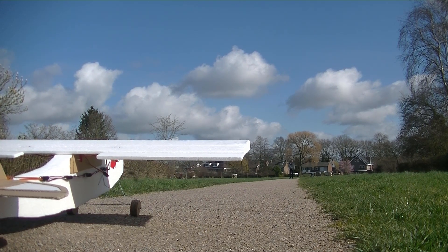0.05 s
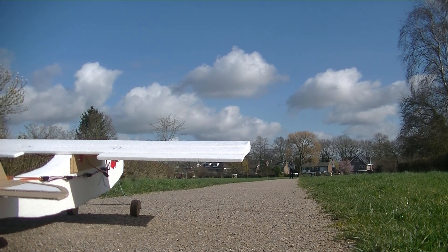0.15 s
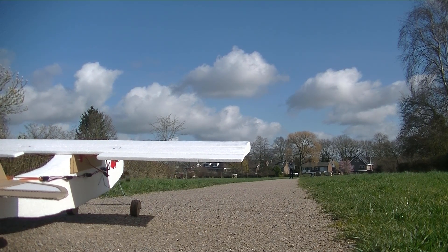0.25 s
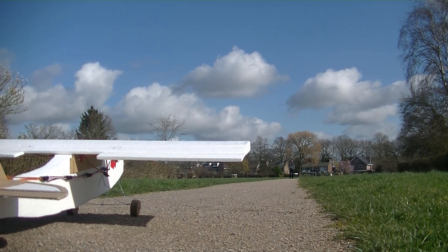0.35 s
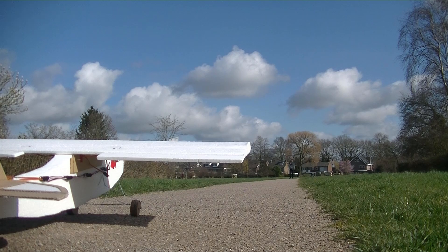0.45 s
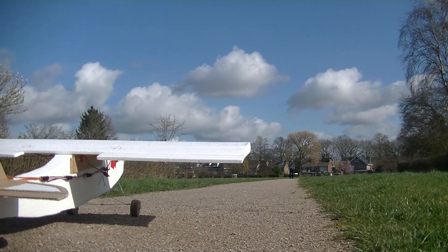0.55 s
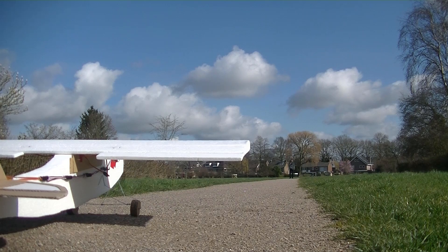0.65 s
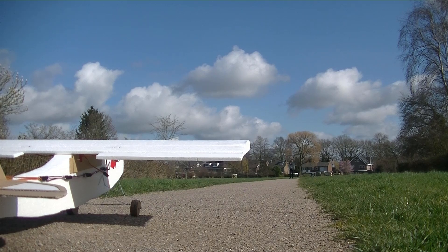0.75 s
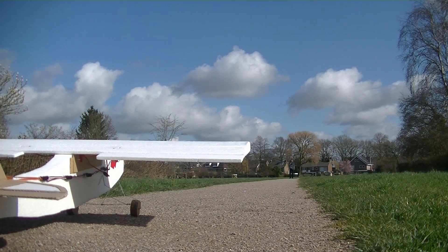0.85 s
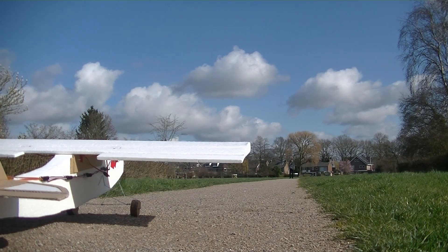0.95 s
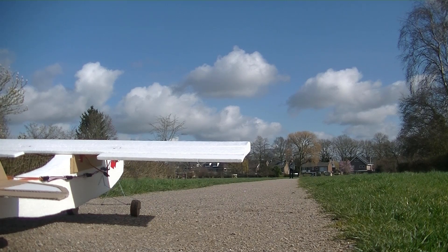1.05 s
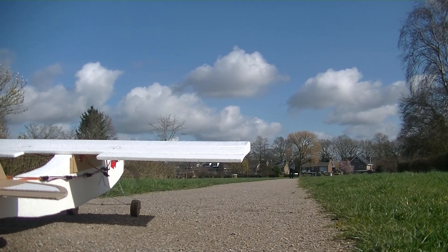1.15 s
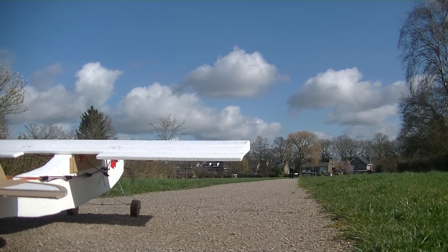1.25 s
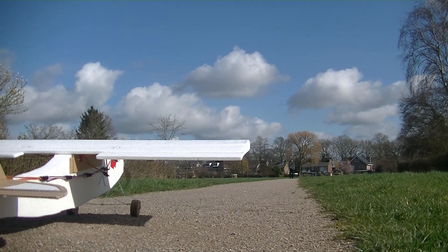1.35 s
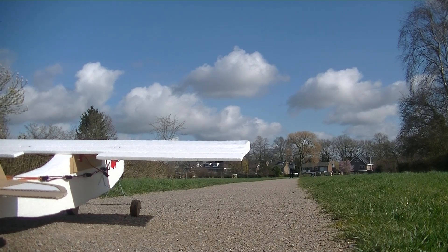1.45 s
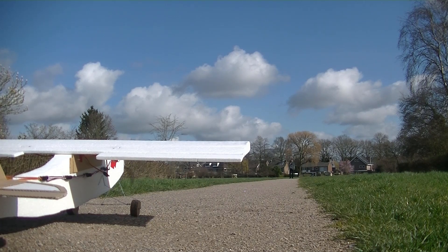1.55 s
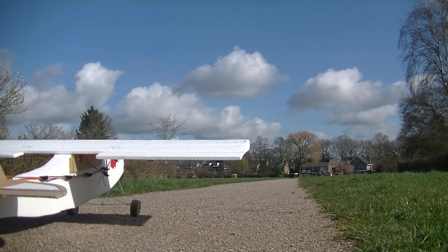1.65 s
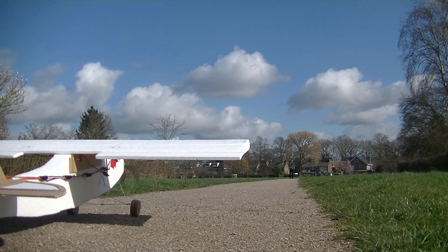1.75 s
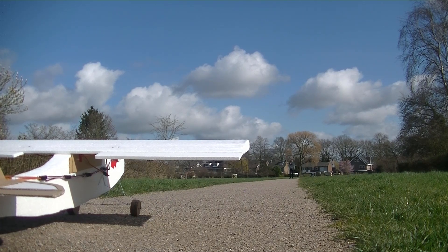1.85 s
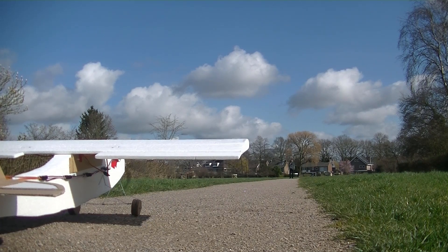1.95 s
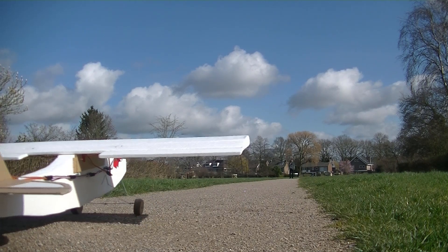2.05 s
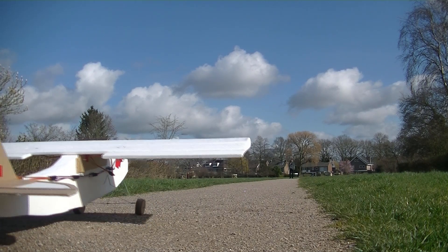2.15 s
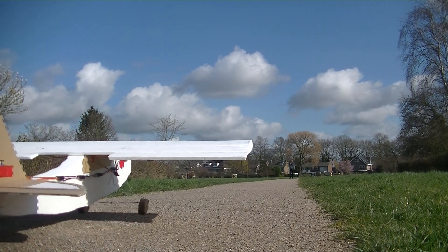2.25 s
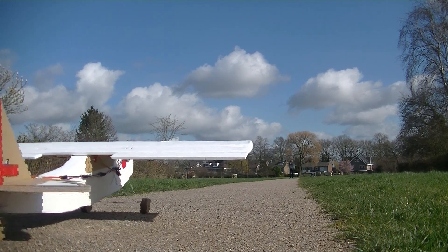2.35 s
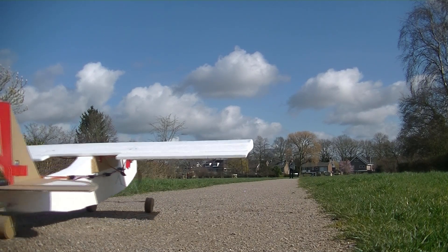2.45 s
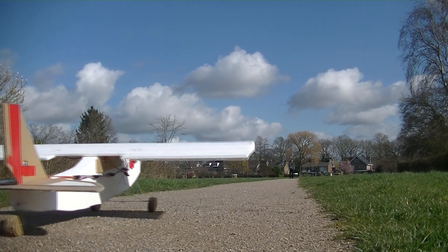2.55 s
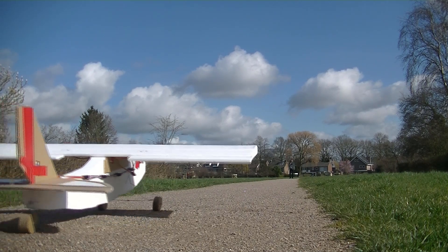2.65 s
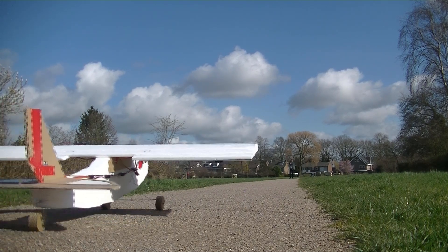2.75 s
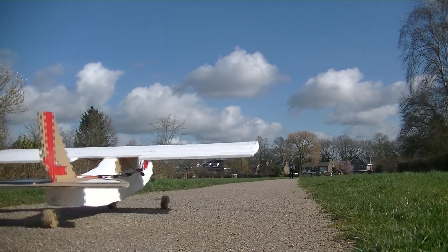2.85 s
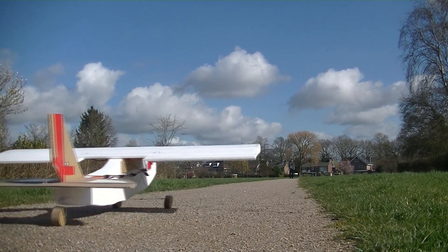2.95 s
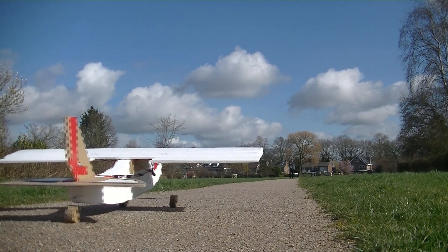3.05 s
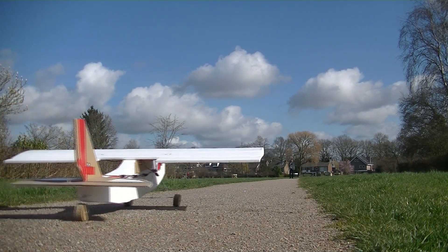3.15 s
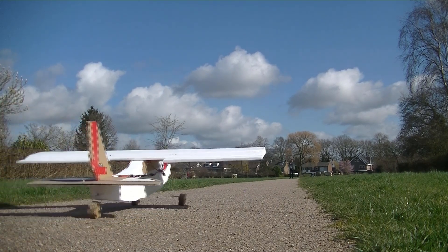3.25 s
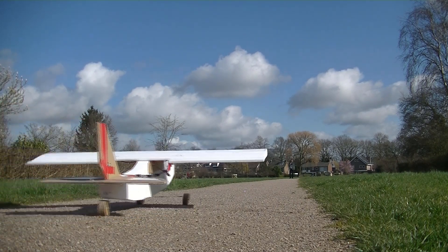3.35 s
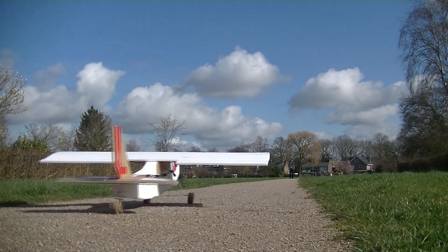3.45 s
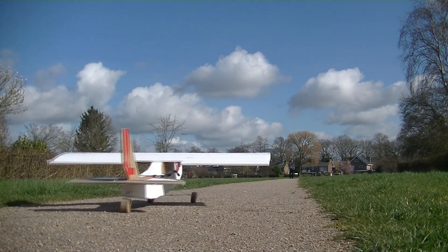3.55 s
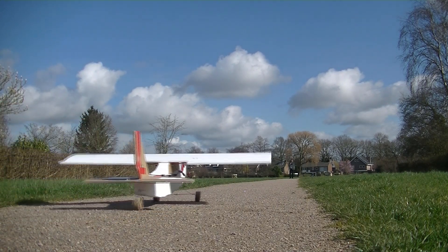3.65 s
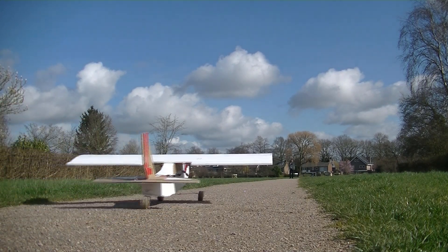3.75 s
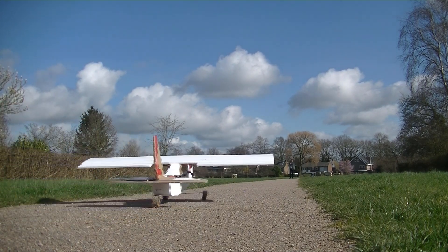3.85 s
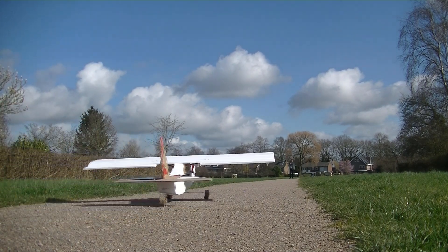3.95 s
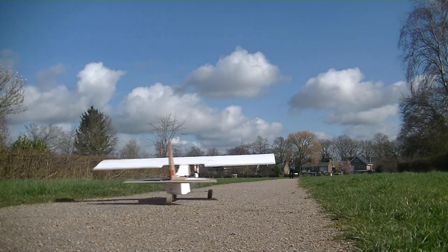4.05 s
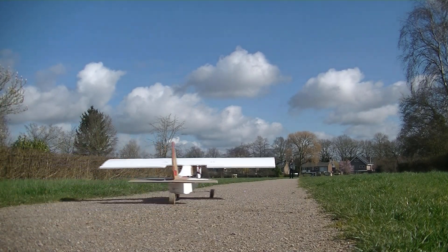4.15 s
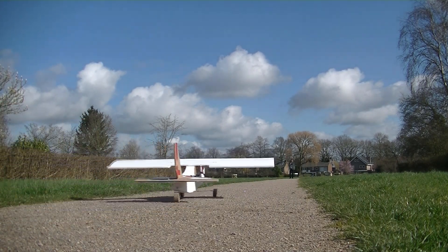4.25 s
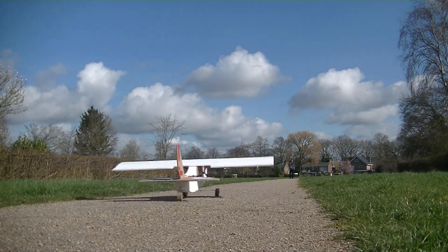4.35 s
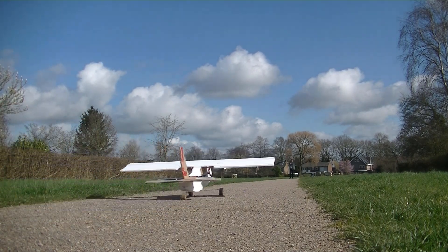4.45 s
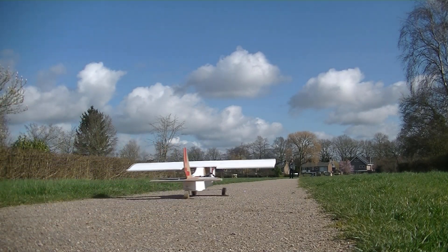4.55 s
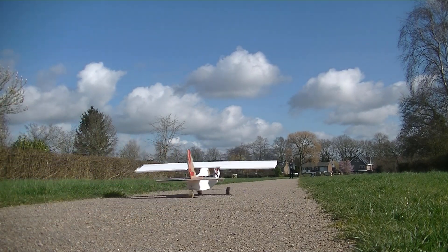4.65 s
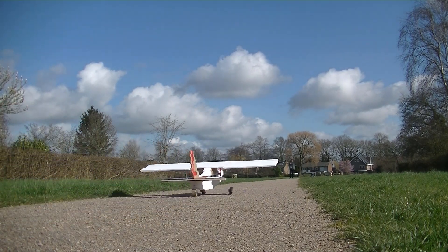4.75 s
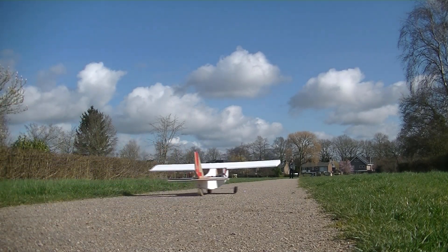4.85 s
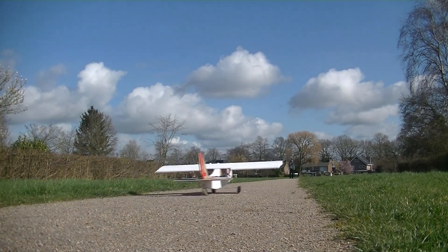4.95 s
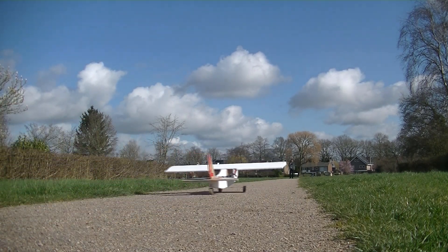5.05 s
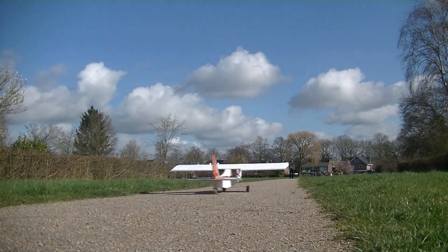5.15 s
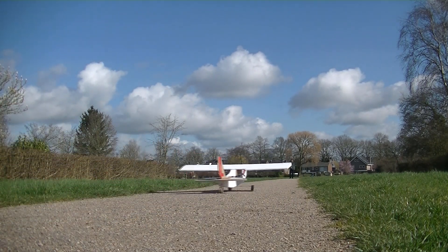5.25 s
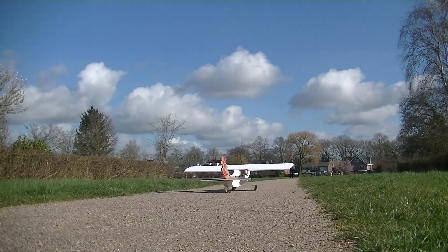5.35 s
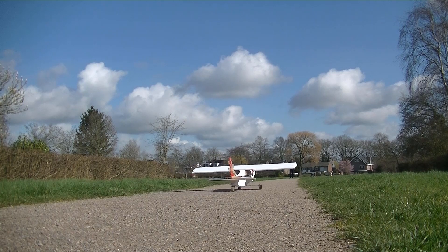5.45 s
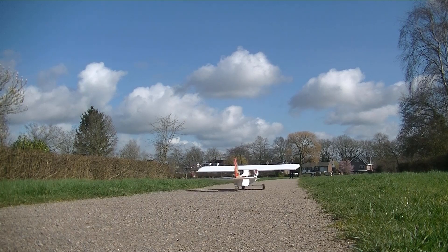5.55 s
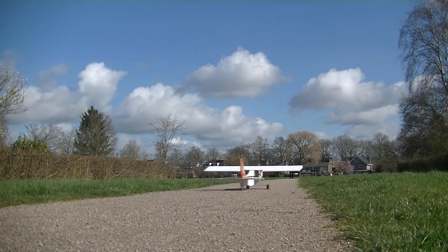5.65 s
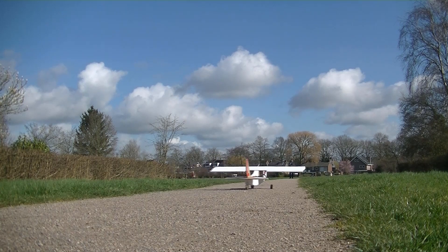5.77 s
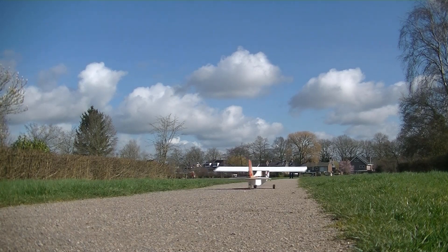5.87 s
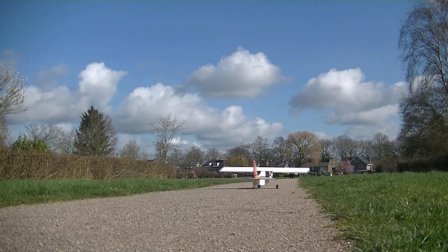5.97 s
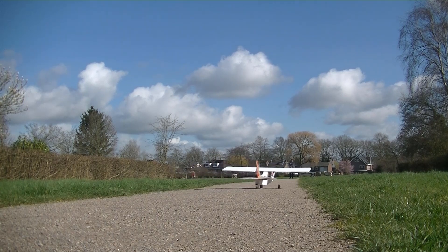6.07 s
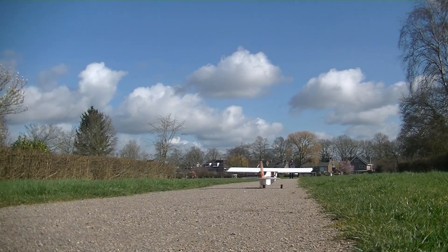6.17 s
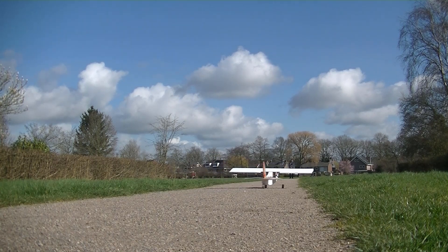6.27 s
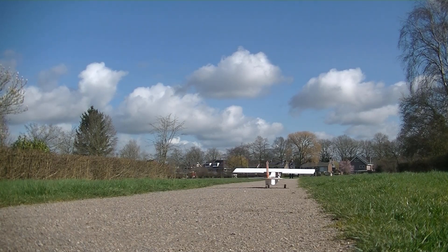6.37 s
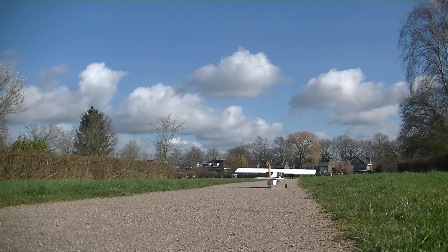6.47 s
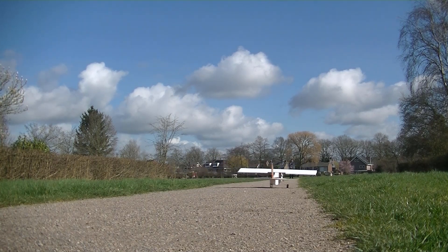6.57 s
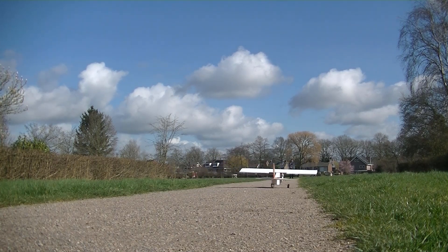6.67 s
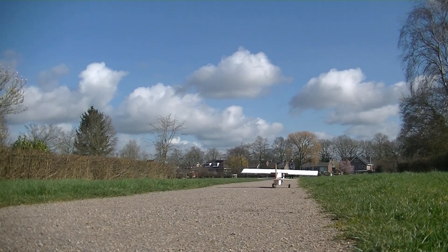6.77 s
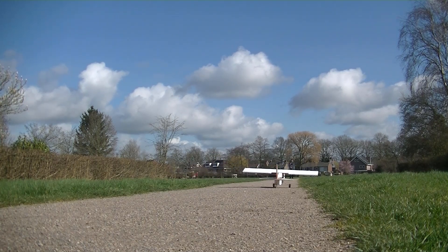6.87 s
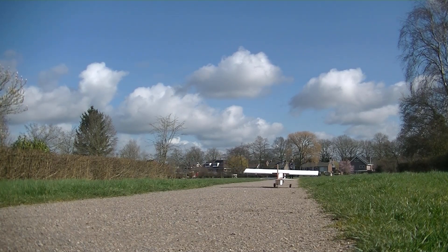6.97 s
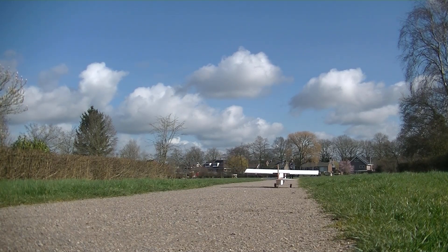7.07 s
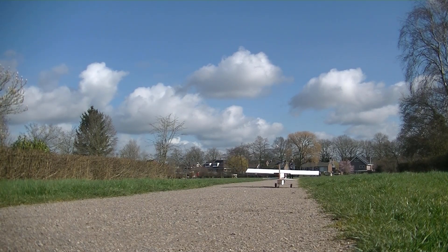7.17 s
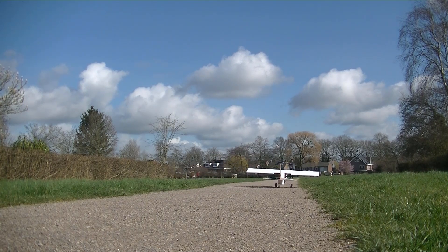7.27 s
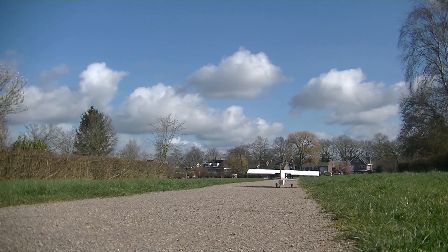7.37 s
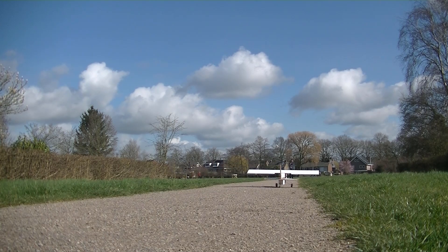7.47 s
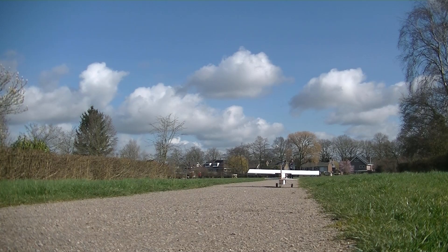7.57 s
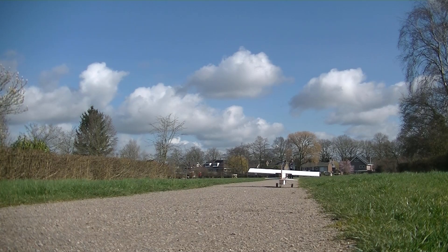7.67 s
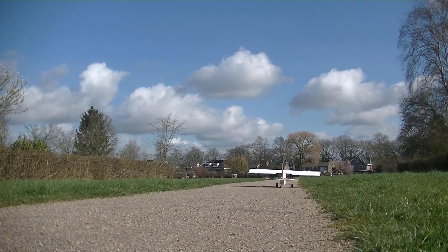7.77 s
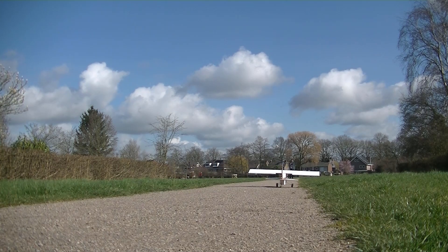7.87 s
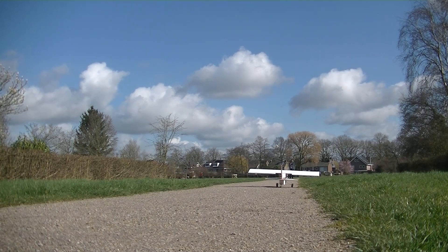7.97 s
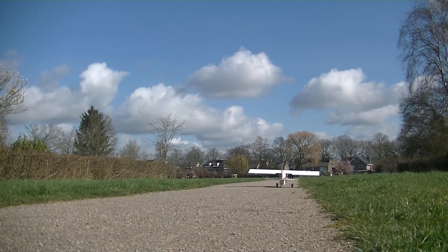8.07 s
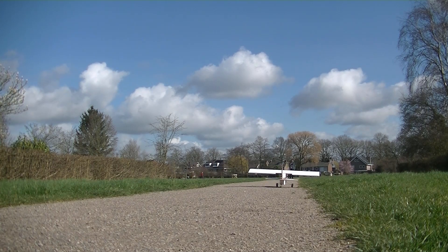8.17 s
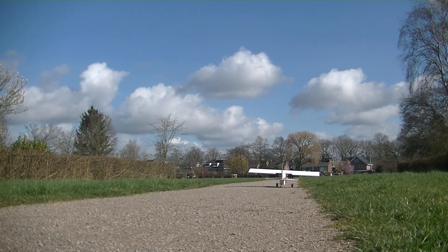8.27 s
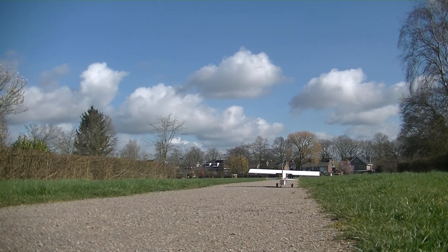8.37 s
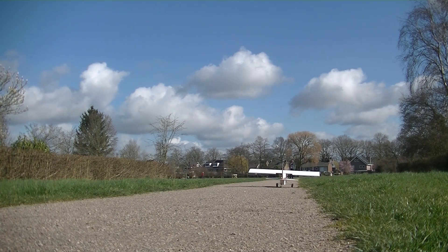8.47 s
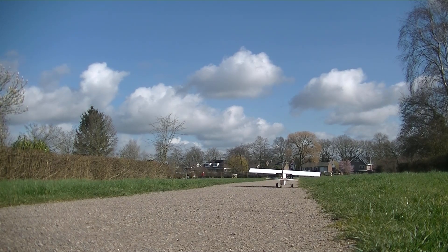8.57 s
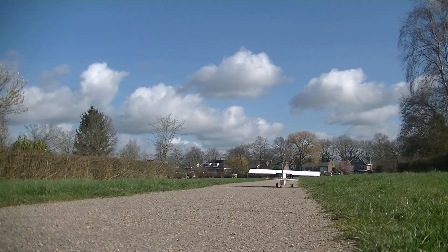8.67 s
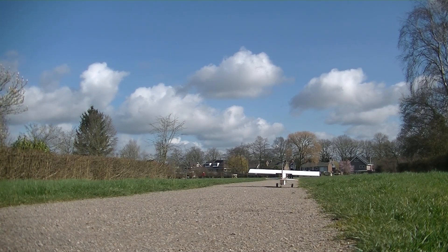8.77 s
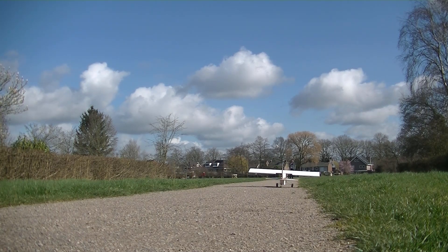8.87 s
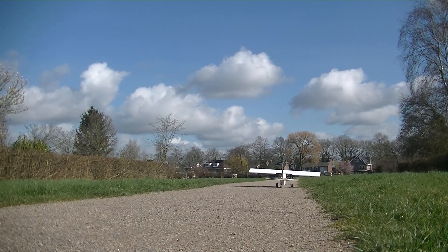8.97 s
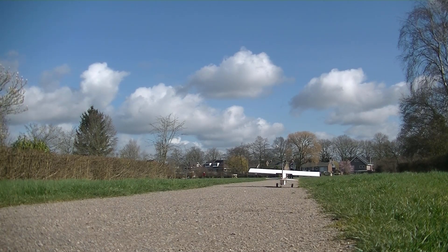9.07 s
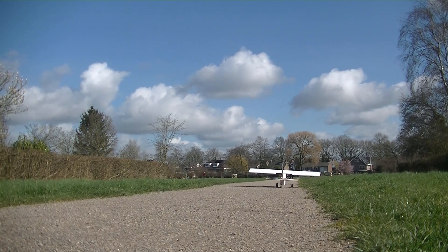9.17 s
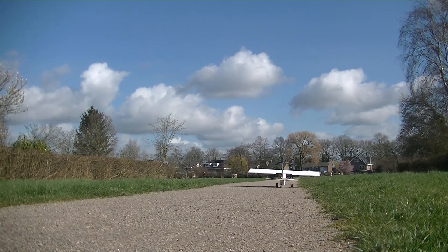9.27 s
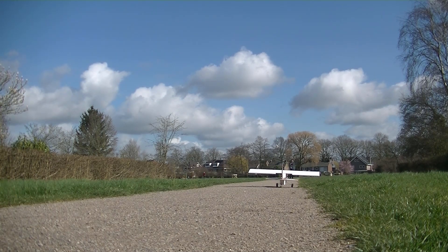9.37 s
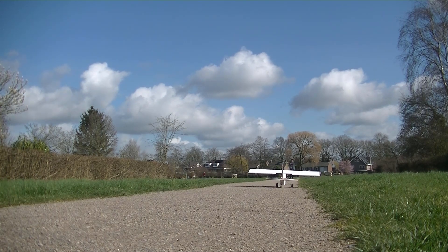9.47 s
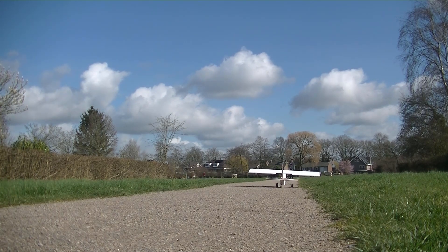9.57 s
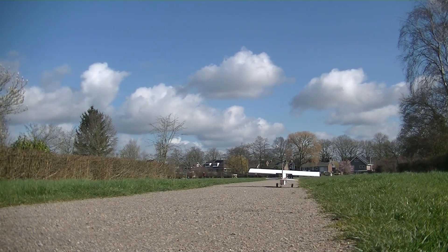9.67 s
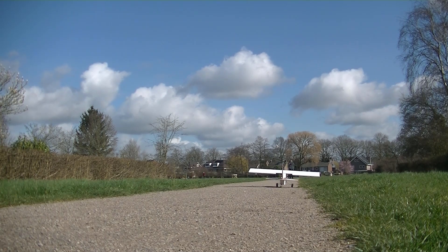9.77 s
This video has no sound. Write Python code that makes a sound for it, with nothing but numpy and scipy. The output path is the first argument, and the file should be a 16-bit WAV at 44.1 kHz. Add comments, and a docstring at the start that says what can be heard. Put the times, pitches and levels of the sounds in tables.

```python
"""A gravel path in a light breeze, the microphone close beside a small electric model plane.
The plane spins up with propeller tones, magnet whine, chopped air and a chattering motor mount,
then taxis away and stops, its wheels rattling the hollow airframe, its slipstream buffeting the
microphone. In the quiet that follows a small bird chirps and shoes shift on the grit close by."""
import sys
import numpy as np
from scipy import signal
from scipy.fft import rfft, irfft, next_fast_len
from scipy.io import wavfile
from scipy.ndimage import uniform_filter1d, map_coordinates

SR = 44100
rng = np.random.default_rng(int(sys.argv[2]) if len(sys.argv) > 2 else 0)


def unload_wav(signal):
    """Save mono or channel-first audio to the path in sys.argv[1] as 16-bit WAV at rate SR, clipped to [-1, 1]."""
    wavfile.write(
        sys.argv[1],
        SR,
        np.round(np.clip(np.atleast_2d(signal).T, -1, 1) * 32767).astype(np.int16),
    )


N = 433052


def amp(db):
    return 10 ** (np.asarray(db) / 20)


def unit(x):
    return x / np.sqrt(np.mean(x ** 2) + 1e-20)


def peaked(x, db):
    return amp(db) * x / abs(x).max()


def along(points, hz):
    """Read (frequency, value) points on a log axis."""
    freqs, values = np.transpose(points)
    return np.interp(np.log(hz + 1), np.log(freqs), values)


def curve(points):
    """Join (time, value) points, one value a sample."""
    return np.interp(np.arange(N) / SR, *np.transpose(points))


def wobble(rate):
    """A smooth random curve, rate knots a second."""
    knots = rng.standard_normal(int(N * rate / SR) + 4)
    grid = np.arange(0, N, 32)
    return np.interp(np.arange(N), grid, map_coordinates(knots, [grid * rate / SR]))


def filtered(x, response):
    """x times a response of frequency."""
    size = next_fast_len(N + SR // 2)
    return irfft(rfft(x, size) * response(np.fft.rfftfreq(size, 1 / SR)), size)[..., :N]


def coloured(x, spectrum, size=2048):
    """x through a causal filter with the given spectrum."""
    cepstrum = irfft(np.log(amp(along(spectrum, np.fft.rfftfreq(size, 1 / SR)))))
    cepstrum[1:size // 2] *= 2
    cepstrum[size // 2 + 1:] = 0
    return signal.oaconvolve(x, irfft(np.exp(rfft(cepstrum))))[:len(x)]


def burst(t60, size=2048):
    """Noise that dies by 60 dB in t60 seconds."""
    return rng.standard_normal(size) * amp(-60 * np.arange(size) / SR / t60)


def grains(rate, spread_db, ring, count=8):
    """Random contacts of uneven size, each with one of count rings drawn from ring()."""
    train = (rng.random(N) < rate / SR) * amp(spread_db * np.clip(rng.standard_normal(N), -2, 2))
    kind = rng.integers(count, size=N)
    return sum(signal.oaconvolve(train * (kind == k), unit(ring()))[:N] for k in range(count))


def fluttering_tone(phase, flutter_db):
    return np.sqrt(2) * np.sin(phase) * amp(flutter_db * wobble(18))


def add(track, s, sound):
    """Mix a sound in at time s."""
    part = track[round(s * SR):][:len(sound)]
    part += sound[:len(part)]


def scattered(x, t60, size=2048):
    """Dense reflections smear x into a dying tail."""
    tail = burst(t60, size)
    return signal.oaconvolve(x, tail / np.linalg.norm(tail))[:N]


# Width of sound from all round the microphone: (frequency [Hz], side minus mid [dB])
DIFFUSE_WIDTH = [(60, 1), (600, 0), (1400, -2.5), (3000, 1.5), (7000, -12.5), (15000, -92)]
def diffuse(spectrum):
    """Stereo noise, widest in the bass and middle."""
    mid, side = (unit(coloured(rng.standard_normal(N), spectrum)) for _ in range(2))
    side = filtered(side, lambda hz: amp(along(DIFFUSE_WIDTH, hz)))
    return np.array([mid + side, mid - side])


# Scatter off the ground near the microphone: (frequency [Hz], side minus mid [dB])
GROUND_SCATTER = [(100, -3), (400, -11), (1000, -14), (2500, -17), (12000, -24)]
# Lead of the left channel: (frequency [Hz], phase [rad])
LEFT_LEAD = [(260, 0), (950, -.9), (3800, .35), (7000, 0)]
def placed(x, balance):
    """A near source leans to one side; ground scatter widens it a little."""
    def lean(hz):
        gains = 2 / (1 + amp(np.outer([-1, 1], along(balance, hz))))
        return gains * np.exp(.5j * np.outer([1, -1], along(LEFT_LEAD, hz)))
    side = filtered(scattered(x, t60=.07), lambda hz: amp(along(GROUND_SCATTER, hz)))
    return filtered(x, lean) + np.array([side, -side])


# Open air around the path: (frequency [Hz], level [dB])
BREEZE_SPECTRUM = [(15, -61), (25, -25), (87, -15), (242, -1), (1400, -9.5), (3820, -5.5), (5570, -6.5),
                   (6560, -9), (7310, -13.5), (14000, -20.5), (16000, -44)]
def breeze():
    """A faint, wavering rush, spread wide, a shade louder on the left."""
    return amp(-57 + .77 * wobble(2.063)) * diffuse(BREEZE_SPECTRUM) * amp([[1], [-1]])


# One call, an arch, a flick up and a fall:
# (delay [s], length [s], start pitch [Hz], middle pitch [Hz], end pitch [Hz], level [dB])
CALL_NOTES = [(0, .058, 3200, 4420, 3400, 0), (.06, .02, 3450, 3900, 4430, -1),
              (.088, .045, 3200, 2950, 2750, 0)]
# Whole calls: (time [s], level [dB])
CALLS = [(7.763, -41), (8.782, -45)]
# Lone notes: (time [s], length [s], start pitch [Hz], middle pitch [Hz], end pitch [Hz], level [dB])
LONE_NOTES = [(7.49, .055, 6000, 5750, 5100, -55), (8.25, .035, 3720, 3950, 3800, -53),
              (8.632, .036, 3600, 3620, 3000, -46)]
def bird():
    """Raspy, gliding whistles off to the left, echoing in the trees."""
    song = np.zeros(N)
    notes = [(s + delay, *shape, db + note_db)
             for s, db in CALLS for delay, *shape, note_db in CALL_NOTES]
    for s, length, *pitches, db in notes + LONE_NOTES:
        progress = np.linspace(0, 1, int(length * SR))
        hz = np.polyval(np.polyfit([0, .5, 1], pitches, 2), progress)
        hz *= 1 + .18 * uniform_filter1d(rng.standard_normal(len(hz)), 40)  # rasp
        envelope = amp(db) * np.sqrt(abs(np.sin(np.pi * progress)))
        add(song, s, envelope * np.sin(2 * np.pi * np.cumsum(hz) / SR))
    song *= amp(2.4 * wobble(400))
    trees = np.array([scattered(song, t60=.7, size=SR // 2) for _ in range(2)])
    return (song + amp(-2) * trees) * amp([[3], [-5]])


# Crushed grit, a hollower tread and a slipping sole: (frequency [Hz], level [dB])
CRUNCH_SPECTRUM = [(100, -48), (500, -19), (1300, -7), (1900, 1), (2400, 0.5), (3300, 6.5), (4800, 1),
                   (6800, 2.5), (7900, -5), (9200, -2), (10400, -15.5), (14000, -13)]
HOLLOW_SPECTRUM = [(100, -41), (900, -13), (1800, 0), (2300, 1), (3200, 5.5), (4850, -12), (5700, 3.5),
                   (7100, 2.5), (8300, -9), (9700, -13), (12000, -14), (15500, -15)]
SCRAPE_SPECTRUM = [(40, -50), (150, -7), (400, -6.5), (850, 3.5), (1100, 0.5), (1800, 1.5), (3500, 9.5),
                   (8000, -10)]
# A shoe bears down: (time of full weight [s], build [s], release [s], crunch [dB], scrape [dB])
FOOTSTEPS = [(7.1, 0.62, .16, -41.5, -48), (7.32, .29, .11, -51, -55), (7.86, .12, .22, -48.5, -58),
             (8.64, .1, .09, -45, -58), (8.728, .08, .025, -41, -37.5), (9.07, .16, .11, -45, -66),
             (9.152, 0.03, .042, -41, -37), (9.27, .22, .094, -34, -40), (9.81, .59, .1, -34, -45.5)]
# A lone sharp click at the start, then stones snapping underfoot: (time [s], level [dB], pitch [Hz])
SHARP_CLICKS = [(0.0354, -20.5, 2290), (7.795, -20, 3800), (7.902, -27, 3300), (8.056, -28.5, 6410),
                (8.452, -23, 3960), (8.4895, -21, 3600), (8.7223, -25, 2930), (8.7302, -19, 2300),
                (9.079, -22, 5950), (9.1482, -18.5, 7340), (9.263, -23, 3600), (9.2878, -22.5, 3600),
                (9.36, -26, 3350), (9.4687, -24, 2960), (9.5135, -16.5, 3120), (9.5659, -13.5, 2850),
                (9.6134, -22, 5650), (9.696, -11, 3000), (9.786, -15, 6450), (9.7965, -17, 5610)]
# Shoes at the microphone: (frequency [Hz], left minus right [dB])
SHOE_BALANCE = [(200, 2), (800, 6), (2400, 3.5), (4400, 1.5), (7000, 0)]
def shoes(hollow_from_s=9.38):
    """Close on the left: a lone opening click; later soles press and scrape the grit and stones snap."""
    grit = grains(rate=2800, spread_db=6.5, ring=lambda: burst(t60=.003))
    crunch, hollow = unit(coloured(grit, CRUNCH_SPECTRUM)), unit(coloured(grit, HOLLOW_SPECTRUM))
    slips = grains(rate=4700, spread_db=10.5, ring=lambda: burst(t60=.0077))
    scrape = unit(coloured(slips, SCRAPE_SPECTRUM))
    track = np.zeros(N)
    for s, build, release, crunch_db, scrape_db in FOOTSTEPS:
        press = curve([(s - build, 0), (s, 1), (s + release, 0)]) ** 2.03
        track += amp(crunch_db) * press * (hollow if s > hollow_from_s else crunch)
        track += amp(scrape_db) * press ** 3.2 * scrape  # the sole slips only under full weight
    for s, db, hz in SHARP_CLICKS:
        spectrum = [(hz * .29, -26), (hz * .62, -3), (hz, 0),
                    (hz * 1.4, -11), (hz * 2, -14), (hz * 3.4, -30)]
        click = burst(t60=.003) + amp(-24) * burst(t60=.02)
        add(track, s, peaked(coloured(click, spectrum), db))
    return placed(track, SHOE_BALANCE)


# Gusts on the microphone: (time fully risen [s], hold [s], level [dB])
PROP_GUSTS = [(0.404, 0.68, -64), (3.715, 0.31, -47), (4.282, .07, -53), (4.4, 0.51, -65.5),
              (5.414, .15, -54.5), (5.58, 0.13, -51), (6.01, 0.028, -54.5)]
# Their rumble: (frequency [Hz], level [dB])
GUST_SPECTRUM = [(25, -37), (70, -20), (130, -5), (230, -2.5), (400, -10), (900, -43)]
def slipstream(rise_db_per_s=170, fall_db_per_s=118):
    """Swirls from the propeller reach the microphone ports, hold and die away."""
    t = np.arange(N) / SR
    gusts = [amp(db + np.minimum(t - s, 0) * rise_db_per_s - np.maximum(t - s - hold, 0) * fall_db_per_s)
             for s, hold, db in PROP_GUSTS]
    return np.max(gusts, axis=0) * amp(1.8 * wobble(24)) * diffuse(GUST_SPECTRUM)


# Modes of the airframe's panels: (frequency [Hz])
PANEL_MODES = [1030, 1600, 2270, 2660, 3080, 3400, 4030, 4420]
def panel_hit(hz=None, t60=.017, focus_db_per_octave=16):
    """A stone cracks against a wheel and rings the panels, most of all those near hz if given."""
    t, modes = np.arange(2048) / SR, np.array(PANEL_MODES)
    strength, detune, start = rng.standard_normal((3, len(modes)))
    db = 4 * strength - (focus_db_per_octave * abs(np.log2(modes / hz)) if hz else 0)
    cycles = np.outer(modes * (1 + .015 * detune), t) + start[:, None]
    ring = amp(db) @ np.sin(2 * np.pi * cycles) * amp(-60 * t / t60)
    return amp(-3) * unit(ring) + unit(burst(t60=.01))


# Response of the hollow airframe: (frequency [Hz], level [dB])
AIRFRAME_SPECTRUM = [(100, -60), (300, -10), (620, -14.5), (760, -8), (1050, -12), (1300, -8), (1600, -9),
                     (1850, -6.5), (2300, -0.5), (2900, -1.5), (3400, 1), (4550, 2), (5150, -11.5),
                     (5700, -19), (6150, -4), (6700, -11.5), (7300, -6.5), (8800, -21.5), (10500, -22),
                     (15500, -51)]
# The plane gathers pace, recedes and stops: (time [s], level [dB])
ROLL_LEVEL = [(1.9, -60), (2.5, -39.5), (3.3, -35), (3.7, -32.5), (5.5, -31), (5.95, -32.5), (6.42, -40),
              (6.75, -40.5), (7.15, -47.5), (7.45, -53), (7.7, -55), (8.0, -69)]
# Coarse patches of path: (middle time [s], length [s], boost [dB])
COARSE_PATCHES = [(2.689, .028, 11.5), (2.751, 0.024, 12.5), (2.967, .025, 4), (3.867, 0.025, 6.5),
                  (4.305, 0.02, 5.5), (4.426, 0.097, 4), (4.805, .05, 6.5), (5.387, .04, 4),
                  (5.606, 0.017, 5.5)]
# Separate stones take over as it slows: (time [s], share of the power [0-1])
STONE_SHARE = [(5.6, 0.16), (6.6, 0.64)]
def airframe_rattle(clumps):
    """Hard wheels drum clumps of gravel into the airframe."""
    t = np.arange(N) / SR
    dense = clumps * grains(rate=1200, spread_db=5, ring=panel_hit, count=20)
    sparse = grains(rate=110, spread_db=4, ring=panel_hit)
    gravel, stones = (unit(coloured(hits, AIRFRAME_SPECTRUM)) for hits in (dense, sparse))
    share = curve(STONE_SHARE)
    rattle = np.sqrt(1 - share) * gravel + np.sqrt(share) * stones
    coarse_db = sum(db * np.exp(-(2 * (t - s) / length) ** 2) for s, length, db in COARSE_PATCHES)
    jolt_db = 1.8 * wobble(22)  # the path is uneven
    return rattle * amp(curve(ROLL_LEVEL) + coarse_db + jolt_db)


# Wheels striking pebbles: (time [s], level [dB], pitch [Hz])
PEBBLE_STRIKES = [(2.38, -14.5, 2720), (2.599, -9.5, 2320), (2.7791, -15, 3780), (2.9631, -14.5, 2640),
                  (3.0758, -14, 2740), (3.0939, -14, 2710), (3.3494, -12.5, 2680), (3.5027, -12, 2700),
                  (3.6097, -12, 2640), (3.6341, -12.5, 3090), (3.71, -12.5, 3040), (3.7818, -13, 2720),
                  (3.8744, -15, 3170), (3.936, -16, 3950), (4.132, -14.5, 4080), (4.2852, -13, 2410),
                  (4.2997, -11.5, 4010), (4.5535, -13.5, 2250), (4.6554, -12, 3380), (4.794, -13, 3350),
                  (4.9744, -6.5, 3370), (5.0731, -13.5, 2630), (5.157, -17, 4060), (5.2042, -14, 4000),
                  (5.3243, -12.5, 3800), (5.437, -9, 3390), (5.5183, -11, 4400), (5.7639, -15, 3400),
                  (5.9222, -16, 3400), (6.214, -21, 3070), (6.2661, -17.5, 4010)]
def pebble_knocks(rebound_db=-9):
    """Each pebble knocks the airframe, then again more softly on the rebound."""
    track = np.zeros(N)
    for s, db, hz in PEBBLE_STRIKES:
        knock, rebound = (coloured(panel_hit(hz), AIRFRAME_SPECTRUM) for _ in range(2))
        add(track, s, peaked(knock, db))
        add(track, s + rng.uniform(.008, .022), peaked(rebound, db + rebound_db))
    return track


# Grit snapping under a tyre: (frequency [Hz], level [dB])
GRIT_SPECTRUM = [(1500, -30), (4000, -12), (5300, -14), (6800, 16.5), (9000, -4.5), (11000, 3.5),
                 (13500, 7), (16000, -7.5)]
# Its running crackle and its single ticks: (time [s], level [dB])
CRACKLE_LEVEL = [(2.1, -68), (2.3, -52.5), (3.05, -45), (3.25, -51), (3.6, -47.5), (4.55, -50), (5, -57),
                 (6.7, -60), (7.5, -79)]
GRIT_TICKS = [(2.3805, -28), (2.4688, -30), (2.4967, -27), (2.5546, -29), (2.7462, -25), (2.9088, -27),
              (3.046, -29), (3.0679, -29), (3.0924, -24), (3.349, -22), (3.5014, -21), (3.5409, -28),
              (3.568, -23), (3.61, -24), (3.7808, -28), (3.9916, -28), (4.2837, -29), (4.3784, -29),
              (4.553, -24), (4.577, -29)]
def tyre_grit(clumps, tick_gain_db=3.5):
    """Fine grit crackles brightly under the tyres, a few ticks standing out."""
    snaps = clumps * grains(rate=150, spread_db=6.5, ring=lambda: burst(t60=.006))
    track = amp(curve(CRACKLE_LEVEL)) * unit(coloured(snaps, GRIT_SPECTRUM))
    for s, db in GRIT_TICKS:
        add(track, s, peaked(coloured(burst(t60=.013), GRIT_SPECTRUM), db + tick_gain_db))
    return track


# Wheels at the microphone: (frequency [Hz], left minus right [dB])
WHEEL_BALANCE = [(300, 5), (700, 5), (1300, .5), (2400, -3), (3300, -1), (4400, 2), (8000, 0)]
def wheels():
    """The wheels roll off down the path; the same clumps of gravel swell rattle and crackle."""
    clumps = amp(2.2 * wobble(45) + 1.2 * wobble(130))
    return placed(airframe_rattle(clumps) + tyre_grit(clumps) + pebble_knocks(), WHEEL_BALANCE)


# Ring of the motor mount: (frequency [Hz], level [dB])
MOUNT_SPECTRUM = [(400, -62), (2300, -2.5), (2750, -0.5), (3080, 6), (3450, -5), (3750, -4), (4200, -13),
                  (5300, -22), (6200, -16), (6650, -1), (7800, -31), (9000, -45.5)]
# Its chatter, hardest at middling speed: (time [s], level [dB])
CHATTER_LEVEL = [(0, -43.5), (.55, -42), (.8, -38.5), (1.25, -38), (1.6, -39.5), (2.3, -39.5), (3.5, -44)]
def mount_chatter(phase):
    """The mount chatters once a turn, every second blade pass."""
    pulses = np.cos(phase / 4 + .3 * wobble(90)) ** 2
    return amp(curve(CHATTER_LEVEL)) * unit(coloured(pulses * rng.standard_normal(N), MOUNT_SPECTRUM))


# Air torn by the blades: (frequency [Hz], level [dB])
AIR_SPECTRUM = [(60, -41), (130, -26.5), (400, -19.5), (650, -14.5), (1050, -7), (1350, -8), (2000, -4.5),
                (2400, -1.5), (3150, -1), (3500, -4), (3850, -6), (5100, -20.5), (6100, -14), (6700, -9),
                (7050, -16.5), (7600, -14), (8800, -25), (10400, -20.5), (14300, -29.5), (15700, -22.5)]
def chopped_air(phase):
    """A rush of air that pulses with every blade."""
    chop = (1 + .27 * np.cos(phase)) * amp(.7 * wobble(40))
    return unit(coloured(chop * rng.standard_normal(N), AIR_SPECTRUM))


# Magnets passing the stator: (multiple of the blade-pass rate, level [dB])
MAGNET_HARMONICS = [(6, -10), (6.5, -15), (7, -4), (7.5, -6), (21, -3), (42, -3), (52.5, -1), (63, 1),
                    (73.5, -6), (84, 1)]
# What the motor's shell and mount radiate: (frequency [Hz], gain [dB])
SHELL_RESPONSE = [(400, -20), (520, -9), (620, -5), (830, 2), (900, -2), (970, -7), (1070, 0), (1300, -8),
                  (1800, -10), (2500, -7), (2900, 4), (4000, -16), (5300, -26), (5600, -11), (6300, -5),
                  (6680, 6), (6950, -3), (7500, -17), (9000, -40)]
# Speed controller whistles: (multiple of the blade-pass rate below the switching rate, level [dB])
CONTROLLER_WHISTLES = [(7, -29), (21, -22), (28, -27)]
def motor_whine(hz, phase, inflow, switching_hz=16050):
    """Each magnet harmonic flares as it sweeps through a resonance of the shell."""
    whine = np.zeros(N)
    for k, db in MAGNET_HARMONICS:
        offset = 2 * np.pi * rng.random() + .7 * inflow * wobble(30)
        gain = amp(db + along(SHELL_RESPONSE, k * hz))
        whine += gain * fluttering_tone(k * phase + offset, flutter_db=1.5)
    # the controller's switching beats with the motor: thin whistles that fall as the speed rises
    switching = 2 * np.pi * switching_hz * np.arange(N) / SR
    whistles = sum(amp(db) * np.sin(switching - k * phase) for k, db in CONTROLLER_WHISTLES)
    whine += whistles * curve([(1.5, 1), (2.2, 0)])
    return whine * (1 + .2 * wobble(110))  # the bearings roughen it


# Propeller tones: (multiple of the blade-pass rate, level [dB])
BLADE_HARMONICS = [(2, -14), (3, -7.5), (4, -6.5), (5, -6.5), (6, -8), (8, -4), (9, -8), (10, -11)]
# They swell as the load grows: (time [s], level [dB])
BLADE_LEVEL = [(0, -74), (.55, -68.5), (.8, -55.5), (1.4, -56), (1.65, -47.5), (2.1, -49), (2.55, -54.5),
               (3.3, -53.5), (5, -56)]
def propeller(phase, inflow):
    """The tones add up to one slap per blade, roughened by uneven inflow."""
    slaps = sum(amp(db) * fluttering_tone(k * phase + inflow * wobble(45), flutter_db=2.8)
                for k, db in BLADE_HARMONICS)
    return slaps * amp(curve(BLADE_LEVEL) + 1 + 2 * wobble(30))


# Throttle moves: (time [s], target blade-pass rate [Hz], lag [s])
THROTTLE_MOVES = [(0, 101.5, .245), (.58, 127.6, .26), (1.6, 143, .17), (1.95, 137.3, .17),
                  (2.3, 144.3, .3)]
def blade_rate(idle_hz=73.8):
    """After each throttle move the motor creeps towards its new speed."""
    t, hz = np.arange(N) / SR, np.full(N, idle_hz)
    for s, goal_hz, lag in THROTTLE_MOVES:
        start = round(s * SR)
        hz[start:] = goal_hz + (hz[start] - goal_hz) * np.exp(-(t[start:] - s) / lag)
    return hz


# The motor fades as the plane taxis away from the microphone: (time [s], gain [dB])
DEPARTURE = [(2.3, 2.5), (3, 1), (4, -1.5), (5, -3.5), (5.8, -10), (6.5, -15), (7.4, -29), (8, -55)]
# Motor and propeller at the microphone: (frequency [Hz], left minus right [dB])
MOTOR_BALANCE = [(100, 5), (380, 10), (700, 7.5), (1300, 1.5), (2400, -2.2), (4400, 0), (7000, 0)]
def motor(cruise_hz=140):
    """One shaft drives blades, whine, air and chatter, first close up, then fading down the path."""
    hz = blade_rate() * (1 + .0009 * wobble(25))
    phase = 2 * np.pi * np.cumsum(hz) / SR
    effort_db = 45 * np.log10(hz / cruise_hz)
    away_db = curve(DEPARTURE)
    inflow = curve([(2.2, .35), (3, .8)])  # phase jitter [rad], greater once the plane rolls
    blades = propeller(phase, inflow)
    whine = motor_whine(hz, phase, inflow) * amp(-48 + .4 * effort_db)
    whine *= amp(.6 * away_db)  # the fuselage soon hides the motor
    air = chopped_air(phase) * amp(-35 + effort_db)
    return placed((blades + whine + air + mount_chatter(phase)) * amp(away_db), MOTOR_BALANCE)


def scene():
    """All that reaches the stereo microphone on the path."""
    return breeze() + motor() + wheels() + slipstream() + shoes() + bird()


def record(dry, top_hz=15900):
    """The recorder keeps nothing above its band limit."""
    return filtered(dry, lambda hz: hz < top_hz)


dry = scene()
out = record(dry)
unload_wav(out)
```